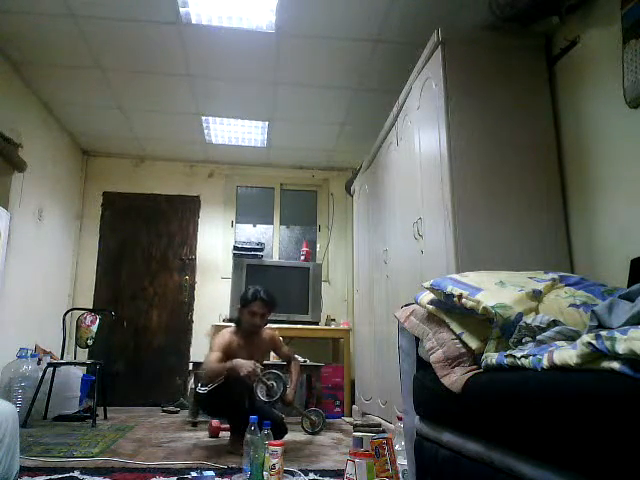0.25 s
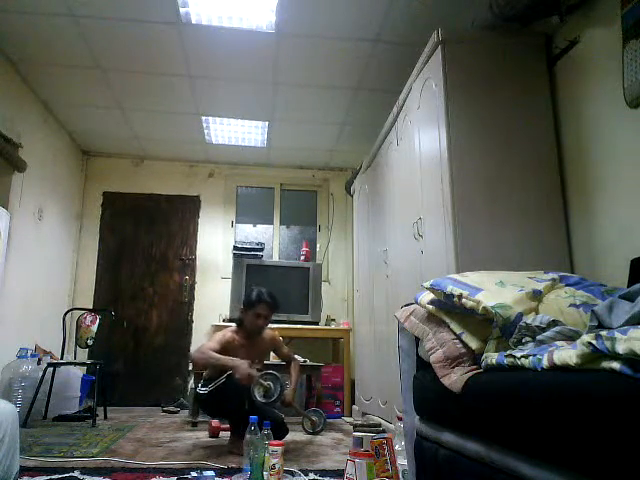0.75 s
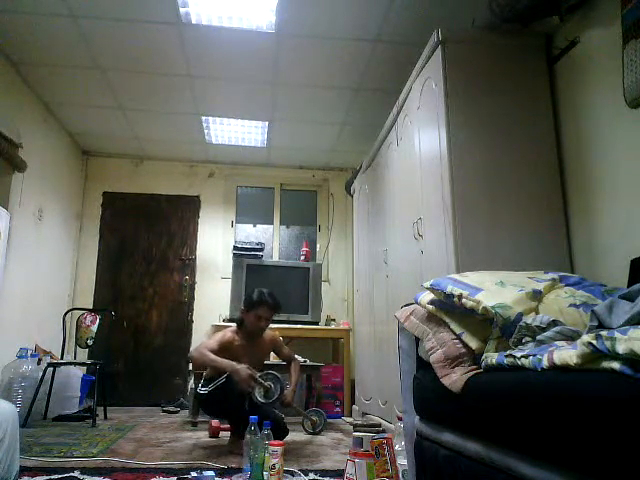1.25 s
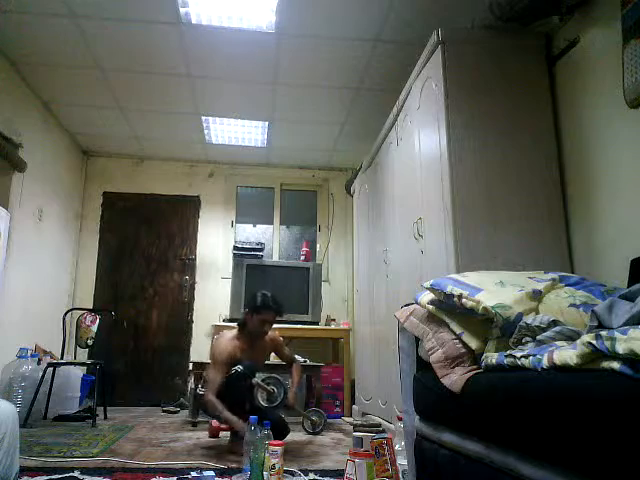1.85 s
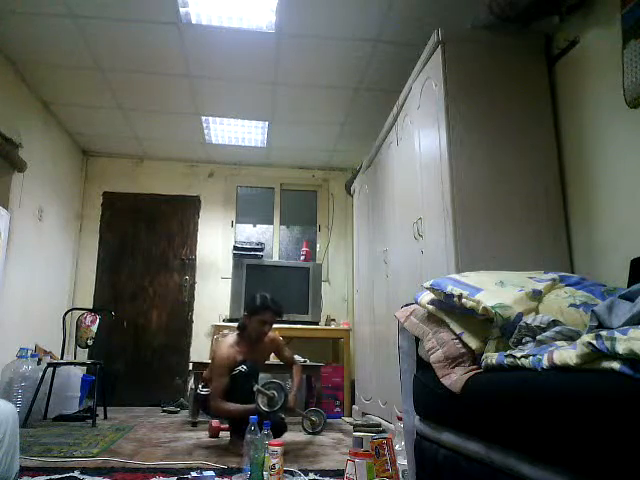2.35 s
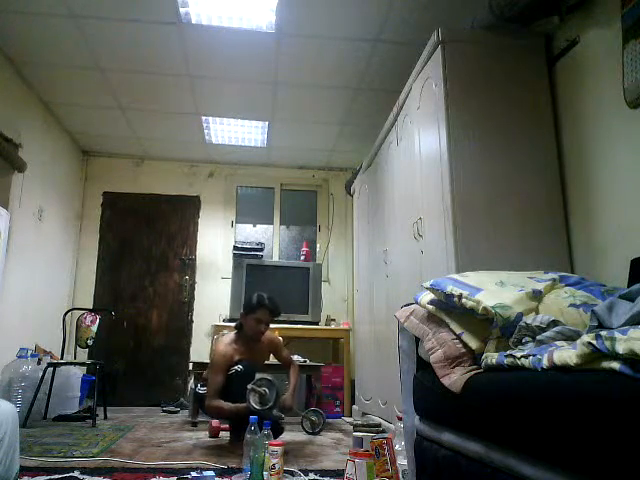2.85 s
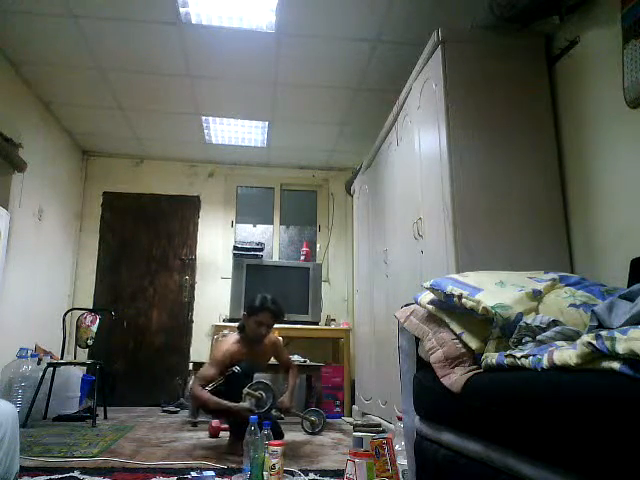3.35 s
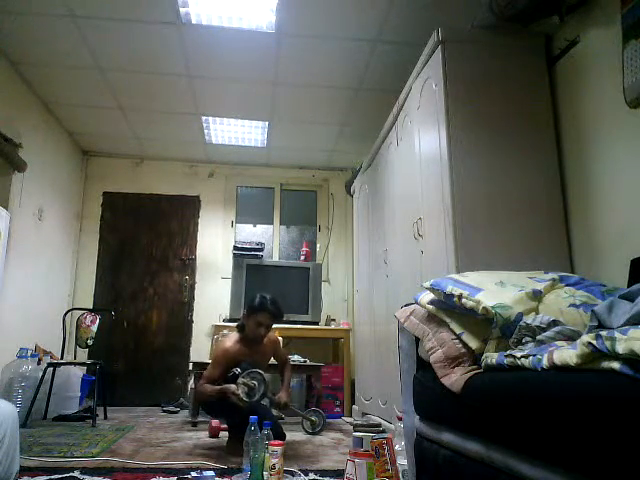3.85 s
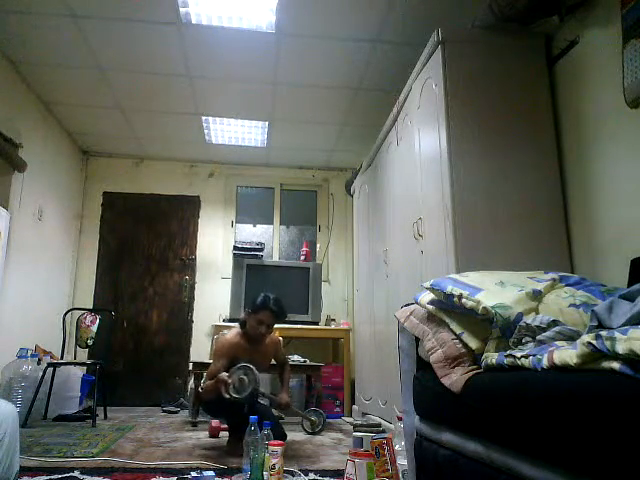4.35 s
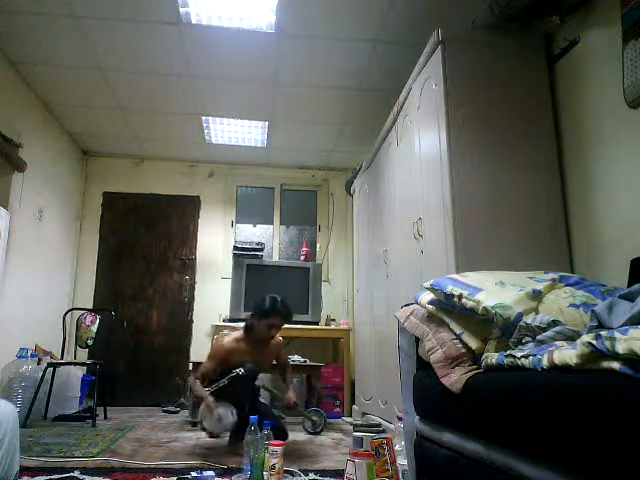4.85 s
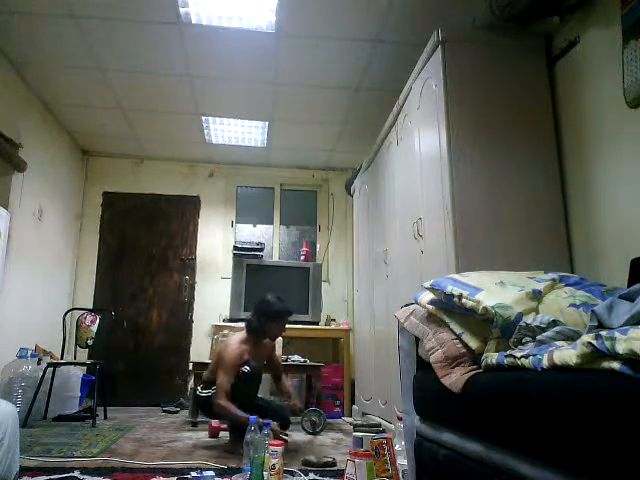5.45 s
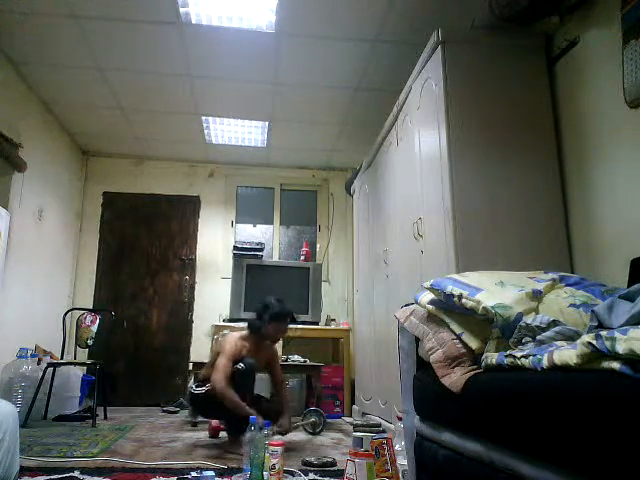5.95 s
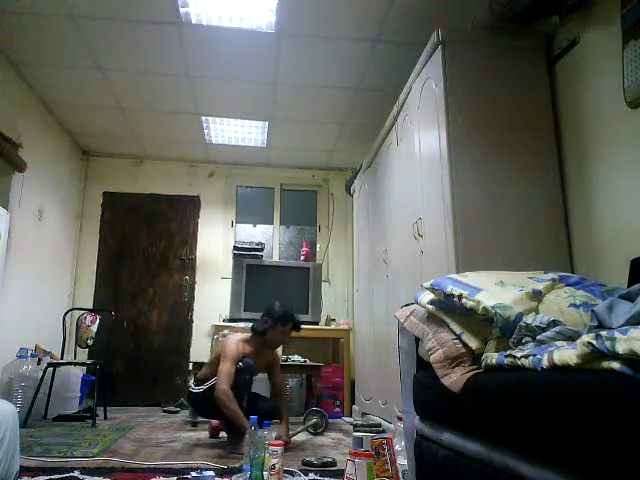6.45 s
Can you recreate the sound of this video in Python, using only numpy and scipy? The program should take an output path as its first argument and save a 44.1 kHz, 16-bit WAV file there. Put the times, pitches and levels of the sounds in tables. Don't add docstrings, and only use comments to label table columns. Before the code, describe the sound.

In a small humming room, light metallic clinks give way to short ringing scrapes of a weight plate, ending with a dull iron thump.

```python
import sys
import numpy as np
from scipy import signal
from scipy.fft import rfft, irfft, next_fast_len
from scipy.io import wavfile
from scipy.ndimage import uniform_filter1d, map_coordinates

SR = 44100
rng = np.random.default_rng(int(sys.argv[2]) if len(sys.argv) > 2 else 0)


def transcribe(signal):
    frames = np.atleast_2d(signal).T
    limited = np.clip(frames, -1, 1)
    pcm = np.round(limited * 32767).astype(np.int16)
    wavfile.write(sys.argv[1], SR, pcm)


def ratio(d):
    e = np.asarray(d, float) / 20
    return 10 ** e


N = 295822


def unit(x):
    return x / np.sqrt(np.mean(x ** 2) + 1e-20)


def along(points, hz):
    f, v = np.transpose(points)
    return np.interp(np.log(hz + 1), np.log(f + 1), v)


def wobble(rate):
    knots = rng.standard_normal(int(N * rate / SR) + 4)
    return map_coordinates(knots, [np.arange(N) * rate / SR])


def power(x, inertia_s):
    return abs(uniform_filter1d(x ** 2, size=round(inertia_s * SR)))


def filtered(x, response):
    m = next_fast_len(x.shape[-1] + SR // 2)
    spectrum = rfft(x, m) * response(np.fft.rfftfreq(m, 1 / SR))
    return irfft(spectrum, m)[..., :x.shape[-1]]


def coloured(spectrum):
    return unit(filtered(rng.standard_normal(N), lambda hz: ratio(along(spectrum, hz))))


def resonance(f, centre, width):
    return 1j * f * width / (centre * centre - f * f + 1j * f * width)


def ringing(x, modes):
    m = next_fast_len(len(x) + SR // 2)
    f, z = np.fft.rfftfreq(m, 1 / SR), rfft(x, m)
    total = 0
    for k, (centre, width, db) in enumerate(modes):
        mode = resonance(f, centre, width)
        share = np.mean(abs(z) ** 2) / np.mean(abs(mode * z) ** 2)
        total = total + (-1) ** k * ratio(db) * mode * np.sqrt(share)
    return irfft(total * z, m)[:len(x)]


def bursts(rows):
    env, t = np.zeros(N + SR), np.arange(SR // 2) / SR
    for start, db, t60, rise in rows:
        fade = ratio(db - 60 * t / max(t60, .004))
        env[round(start * SR):][:len(t)] += fade * (1 - np.exp(-t / max(rise, 1e-4)))
    return env[:N]


def swells(rows):
    t = np.arange(N) / SR
    return sum(ratio(db - np.where(t < peak, swell * (peak - t), fade * (t - peak)))
               for peak, db, swell, fade in rows)


def background(handling):
    # frequency in Hz, level in dB.
    cooler = [(15, -56.5), (25, -24.5), (39, -13), (59, 2), (72, -10), (82, -21), (102, -4.5), (166, -4),
              (199, 1.5), (313, -7.5), (386, -10.5), (433, -14), (509, -11.5), (534, -15), (1200, -27),
              (1560, -57), (2640, -120)]
    # frequency in Hz, width in Hz, level in dB.
    motor = [(55.4, 6.6, -71.5), (118, 3.4, -62.5), (199, 0.73, -72), (228, 4.3, -74.5), (963, 23, -79)]
    # frequency in Hz, level in dB.
    hiss_mid = [(350, -34), (600, -17.5), (830, -9), (1450, -1.5), (2300, -1), (4070, 0.5), (7500, -7),
                (9450, -5.5), (12500, 1), (14400, -1.5), (15600, -0.5), (16000, -37.5)]
    # frequency in Hz, level in dB.
    hiss_side = [(15, -39), (49, -0.5), (86, -10.5), (193, -5), (420, -13), (800, -18), (1200, -24.5),
                 (3500, -17), (8500, -18.5), (12500, -13), (15600, -13), (16000, -44)]
    hum_db, shake_db = -56.5, -37
    shake_grows, shake_s = 0.59, 0.088
    busy = power(handling, shake_s) ** (shake_grows / 2)
    flutter = ratio(0.76 * wobble(5.58) + 2.0 * wobble(40))
    rush = (ratio(hum_db) + ratio(shake_db) * busy) * unit(flutter * coloured(cooler))
    mid = rush + ringing(rng.standard_normal(N), motor) + ratio(-58) * coloured(hiss_mid)
    whine = ringing(rng.standard_normal(N), [(12897, 8, -70)])
    side = ratio(-52) * coloured(hiss_side) + whine
    return np.array([mid + side, mid - side])


def room(x):
    # frequency in Hz, t60 in seconds.
    walls = [(100, .35), (1000, .28), (3000, .23), (6000, .2), (10000, .15)]
    # frequency in Hz, level in dB.
    wall_bass = [(250, -8), (500, 2)]
    # frequency in Hz, unshared part as a share.
    apart = [(150, 0.1), (1000, 0.5), (3000, 0.84), (6000, 1.29)]
    hz, t, z = signal.stft(rng.standard_normal((3, SR // 2)), SR, nperseg=256)
    decay_db = along(wall_bass, hz)[:, None] - 60 * t / along(walls, hz)[:, None]
    pair = (z[0] + along(apart, hz)[:, None] * z[1:]) * ratio(decay_db)
    tail = signal.istft(pair, SR, nperseg=256)[1]
    tail = tail / np.linalg.norm(tail[0])
    late = np.pad(x, (200, 0))[None]
    return signal.fftconvolve(late, tail, axes=1)[:, :N]


def thuds():
    # start in seconds, level in dB, push in ms, carpet puff in dB, deep boom in dB.
    weights = [(0.371, -49, 0.62, -11, -22), (1.955, -27.5, 2.7, -13.5, -8), (2.144, -29, 4.8, -21, -15.5),
               (2.251, -49.5, 2.6, -8, -8), (3.652, -34.5, 2.7, 4, -11), (3.736, -29.5, 3.4, -4, -36),
               (4.054, -31.5, 1.8, -2.5, -14), (5.419, -31.5, 4.9, -13.5, -3),
               (5.427, -37.5, 5.9, -12.5, -25), (5.599, -6, 2.2, -15.5, -17.5),
               (5.678, -17, 2.1, -16.5, -18.5), (5.78, -28.5, 11, -25.5, -24)]
    taps = [
        (.599, -60, 0.35, 19.5, -21),
        (2.516, -44.5, .8, 1.5, -24),
        (2.642, -34, .35, -3, -17),
        (3.057, -50, 0.63, 1, -32),
    ]
    # frequency in Hz, width in Hz, level in dB.
    floor_modes = [(173.4, 9.3, -25), (222, 16, -22), (254, 21, -10), (280, 18, -20), (345, 23.8, 1.5),
                   (401, 33, 1), (444, 29, 2), (529, 49, 1), (683, 20, -15.5), (807, 30, -11.5),
                   (1296, 20, 0)]
    # frequency in Hz, level in dB.
    boards = [(88, -47), (150, -6), (194, -9), (252, -1), (330, -3.5), (442, -14.5), (537, -25), (600, -33),
              (900, -43.5), (1170, -62), (1980, -120)]
    # frequency in Hz, level in dB.
    deep = [(29, -56), (50, -29), (86, 0.5), (108, 3.5), (140, -30), (180, -3), (230, 7), (400, -120)]
    # frequency in Hz, level in dB.
    carpet = [(590, -22), (1000, -10), (1210, -16.5), (1910, -16), (2560, -8), (4720, -14), (7260, -28.5),
              (11400, -23.5), (15000, -32)]
    hits = weights + taps
    push, t = np.zeros(N), np.arange(SR // 50) / SR
    for start, peak_db, ms, *_ in hits:
        pulse = t ** 2 * np.exp(-t / (ms / 7000))
        push[round((start + .001) * SR):][:len(t)] -= ratio(peak_db) * pulse / pulse.sum()
    floor = filtered(push, lambda f: sum(ratio(db) * resonance(f, c, w) for c, w, db in floor_modes))

    s, db, _, puff_db, boom_db = np.transpose(hits)
    t60 = np.array([0.12] * len(weights) + [0.073] * len(taps))

    def shape(delay, gain_db, stretch, rise):
        return bursts(zip(s + delay, db + gain_db, stretch * t60, np.full(len(s), rise)))

    rumble = shape(0.0015, -7, 1.89, 0.0037) * coloured(boards)
    boom = shape(0.0033, boom_db + 3.5, 2.77, 0.0066) * coloured(deep)
    puff = shape(0.0037, puff_db + 2.5, 0.61, 0.009) * coloured(carpet)
    return np.array([ratio(41.5) * floor, rumble + boom + puff])


def disc():
    # start in seconds, level in dB.
    landings = [
        (5.603, -18.5),
        (5.68, -39.5),
    ]
    # frequency in Hz, width in Hz, level in dB.
    disc_modes = [(675, 22, -7), (782, 24, -7), (932, 15, -12), (1002, 17.4, -4)]
    sound, t = np.zeros(N + SR), np.arange(SR // 2) / SR
    for start, level_db in landings:
        for hz, width, db in disc_modes:
            swing = np.exp(-np.pi * width * t) * (1 - np.exp(-t / 0.016)) * np.sin(2 * np.pi * hz * t)
            sound[round(start * SR):][:len(t)] += ratio(level_db + db) * swing
    return sound[:N]


def grit(rate, spread_db):
    hit = rng.random(N) < rate / SR
    x = hit * rng.standard_normal(N) * ratio(spread_db * rng.exponential(size=N))
    return x / np.sqrt(abs(uniform_filter1d(x ** 2, size=600)) + 1e-6)


def steel(force, spans, modes, ring_db, rasp_db):
    # frequency in Hz, level in dB.
    rasp = [(59, -55), (100, -14.5), (219, -14.5), (800, -20), (1380, -18), (2400, -11.5), (3200, -5),
            (4000, -17.5), (5640, -16), (6400, -40.5), (7220, -58), (10500, -37), (14000, -69)]
    contacts = force * grit(rate=6000, spread_db=0.5)
    ring = np.zeros(N)
    for (start, end), span_modes in zip(spans, modes):
        a, b = round(start * SR), round(end * SR)
        ring[a:b + SR // 2] += ringing(np.pad(contacts[a:b], (0, SR // 2)), span_modes)
    scrape = filtered(contacts, lambda hz: ratio(along(rasp, hz)))
    return np.array([ratio(ring_db) * ring, ratio(rasp_db) * scrape])


def collar():
    # start in seconds, peak level in dB.
    clinks = [(0.1435, -42.5), (0.537, -38.5), (0.598, -40), (0.768, -45), (0.849, -29.5), (0.9653, -38.5),
              (1.056, -32.5), (1.07, -29), (1.0823, -20.5), (1.11, -44), (1.168, -23), (1.1743, -23.5),
              (1.2044, -51), (1.2386, -26), (1.38, -24.5), (1.389, -19.5), (1.42, -30.5), (1.4594, -40),
              (1.5534, -30), (2.5099, -44.5), (2.647, -45.5), (3.662, -29)]
    # frequency in Hz, width in Hz, level in dB.
    collar_modes = [(836, 9, -16), (1220, 17, -12.5), (1237, 62, -11), (1730, 18, -7), (1860, 150, 2.5),
                    (2050, 420, 7), (2664, 21, -0.5), (3045, 14, 3), (3570, 20, 2), (4020, 59, -2.5),
                    (4660, 37, -8), (5000, 21, -13.5), (5500, 50, -44), (5193, 42, -6), (6150, 110, -13),
                    (6370, 130, -47)]
    turns = [.1, .7, 1.02, 1.16, 1.36, 1.5, 2.4, 3.8]
    held = [(hz, 1.8 * width + 20, db) for hz, width, db in collar_modes]
    force = bursts([(s, db, 0.062, 0.0082) for s, db in clinks])
    return steel(force, zip(turns, turns[1:]), [held] * len(turns), ring_db=-9.5, rasp_db=6.5)


def chord(spot, grip, ring_db, hard_db, up_db, free_hz, free_db, narrow):
    bar_hz = [845, 1135, 1440, 1765, 2133, 2614, 3112, 3515, 4035, 4560, 5143, 5735, 6340]
    # width in Hz, level in dB.
    bar = [(11.111, -21), (14.3, -9.5), (21.9, -10.5), (12.963, -9.5), (12, -7.5), (13, -5), (12.6, 1),
           (18, -7), (20, -11), (16.9, -13.5), (14, -23), (16, -22.5), (16, -28)]
    twin_hz = [2180, 2580, 3055, 3155, 3995, 4115, 4600, 5535]
    # width in Hz, level in dB.
    twins = [(17, -9.5), (13, -2.5), (12, 0.5), (42, -5.5), (16.7, -5), (15, -29), (47.222, -10.5),
             (26, -9)]
    bend_hz, node_leak = 17.7, .08
    modes = []
    for hzs, shapes, side in [(bar_hz, bar, .5), (twin_hz, twins, -.5)]:
        for hz, (width, db) in zip(hzs, shapes):
            free = hz == free_hz
            swing = abs(np.cos(np.pi * spot * np.sqrt(hz / bend_hz)))
            reach_db = 20 * np.log10(swing + node_leak)
            hardness_db = hard_db * np.log2(hz / 3000)
            level_db = db + ring_db + side * up_db + hardness_db + reach_db + free_db * free
            modes.append((hz, width * grip * (narrow if free else 1), level_db))
    return modes


def plate():
    # peak in seconds, level in dB, swell in dB/s, fade in dB/s.
    strokes = [(2.785, -13.5, 330, 201), (2.835, -20.5, 592, 171), (3.749, -24.5, 904, 185.5),
               (3.798, -12.5, 2497, 194), (4.07, -16.5, 1998.5, 227), (4.18, -17, 252, 300),
               (4.224, -10.5, 450, 169.5), (4.498, -19.5, 297, 136), (4.6, -53, 98, 212)]
    # start in seconds, peak in dB, t60 in seconds.
    knocks = [(2.707, -26.5, 0.17), (2.728, -22, 0.062), (2.782, -23, 0.056), (2.828, -3, 0.03),
              (2.848, -7, 0.029), (2.8694, -47, 0.024), (3.745, -17.5, .03), (3.793, -6.5, 0.071),
              (3.825, -4, 0.098), (3.864, -15.5, 0.13), (4.065, -1, 0.021), (4.1865, -3, 0.051),
              (4.2044, -20, 0.017), (4.227, -1, 0.027), (4.264, -11, 0.059), (4.2994, -20, 0.045),
              (4.3827, -22.5, 0.15), (4.419, -18, 0.04), (4.466, -8, 0.016), (4.483, -8, 0.054),
              (4.546, -27.5, 0.17)]
    # start in seconds, level in dB.
    cracks = [(2.8278, -1), (3.7933, -1), (4.073, -22), (4.1877, 3), (4.204, -8), (4.229, -8),
              (4.2621, -13), (4.4665, -18)]
    places = [2.6, 2.82, 3.5, 3.79, 4.0, 4.13, 4.37, 4.8]
    # spot as a share of the bar's length, hand damping as a width factor,
    # ring in dB, hardness in dB/octave, up over sideways in dB.
    contact = [(0.171, 0.67, 0, -4.7, 1), (0.015, 1.36, 0, 3.9, 2.5), (0.25, 0.94, 5.5, -2, 3.5),
               (0.042, 1.4, 2, 4.7, 7.4), (0.247, 1.06, -5, 4.8, 5), (0.053, 2.17, 2.04, 0, 7),
               (0.2184, 1.17, -5, 7.5, 5.5)]
    free_modes = [5143, 2133, 2180, 3112, 4560, 3112, 3112]
    # level over the held modes in dB, width factor.
    singing = [(19.5, 0.73), (6.5, 0.33), (-1, .8), (3, .8), (8, 0.78), (-2, 0.4), (3, 1.2)]
    # frequency in Hz, width in Hz (20 is used instead), level in dB.
    bar_top = [(7710, 53, -24), (8330, 97, 1), (9090, 45.4, -44), (9770, 36, -6.5), (10420, 50.8, -18),
               (10800, 55, 3), (11500, 32, -1), (12170, 53, -1.5), (12900, 80.2, -5.5)]
    force = swells(strokes) * ratio(-1.5 + 2.0 * wobble(60))
    force += bursts([(s, db, t60, 0.0047) for s, db, t60 in knocks])
    force += bursts([(s, db, 0.0085, .0005) for s, db in cracks])
    high = [(hz, 20, db - 30.0) for hz, _, db in bar_top]
    modes = [sorted(chord(*row, hz, *free)) + high for row, hz, free in zip(contact, free_modes, singing)]
    return steel(force, zip(places, places[1:]), modes, ring_db=-12.0, rasp_db=2.5)


def scene():
    # frequency in Hz, level in dB.
    lean = [(60, 1), (110, 1.5), (200, -2), (380, 0.5), (700, 3), (1290, 1.5), (2380, 5), (4400, 1.5),
            (8120, -3.5), (15000, 8)]
    # frequency in Hz, radians.
    lead = [(200, .05), (3200, .1), (3620, .7), (4300, .9), (5250, 1.9), (6600, 2.1)]
    ring, noise = plate() + collar() + thuds()
    ring = ring + disc()
    half = np.array([[.5], [-.5]])

    def microphones(hz):
        thin = 1 / np.sqrt(1 + (75 / (hz + 1)) ** 8)
        return thin * ratio(half * along(lean, hz)) * np.exp(1j * half * along(lead, hz))

    air = ring + ratio(1) * noise + room(ratio(-2) * ring + ratio(1.0) * noise)
    return filtered(air, microphones) + background(air[0])


def squeezed(x):
    def band(low_hz, high_hz):
        return filtered(x.mean(axis=0), lambda hz: (hz > low_hz) & (hz < high_hz))

    start_db, depth, inertia_s = -47, .6, .04
    clinks = power(band(4000, 6400), inertia_s)
    return x - depth * band(6650, 9600) * clinks / (clinks + ratio(2 * start_db))


def roll_off(x):
    return signal.sosfilt(signal.butter(12, 16110, fs=SR, output="sos"), x)


def record(dry):
    mix = filtered(squeezed(dry), lambda hz: hz < 15520)
    return roll_off(mix)


dry = scene()
out = record(dry)
transcribe(out)
```